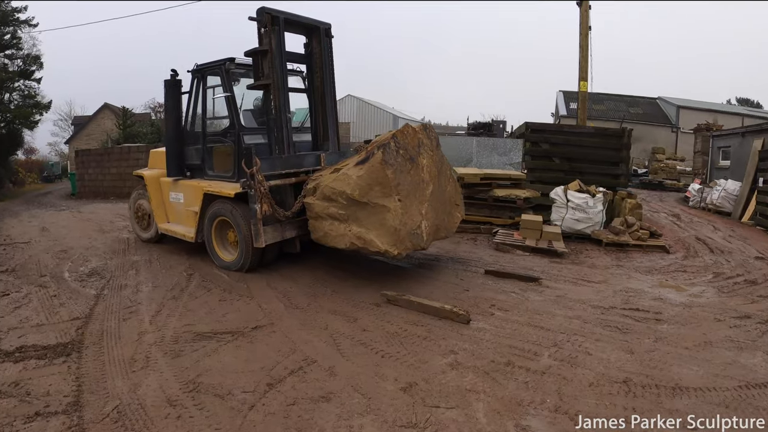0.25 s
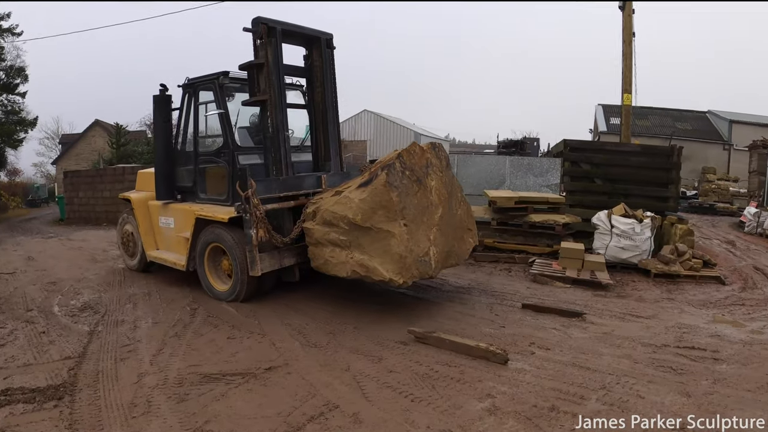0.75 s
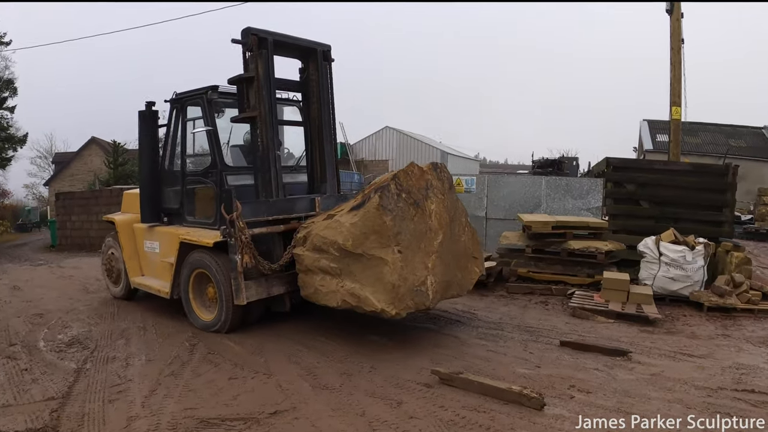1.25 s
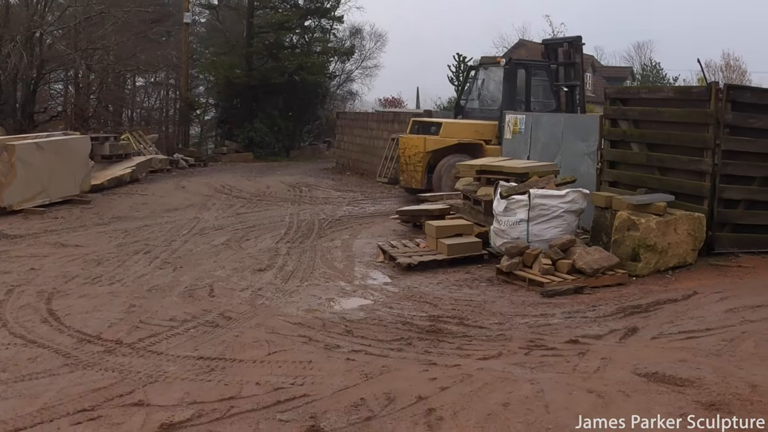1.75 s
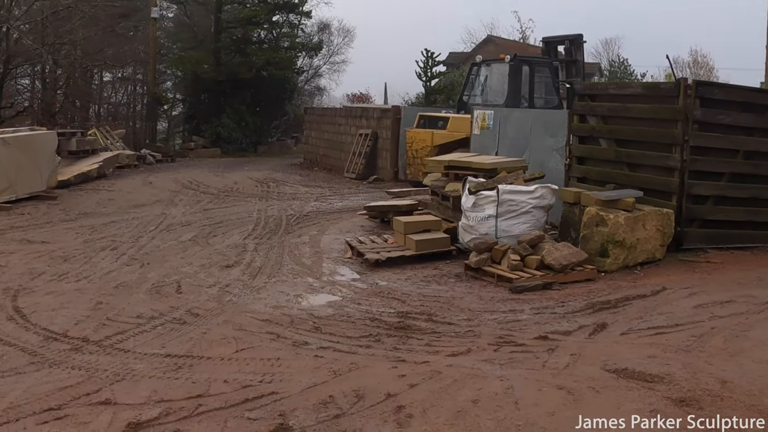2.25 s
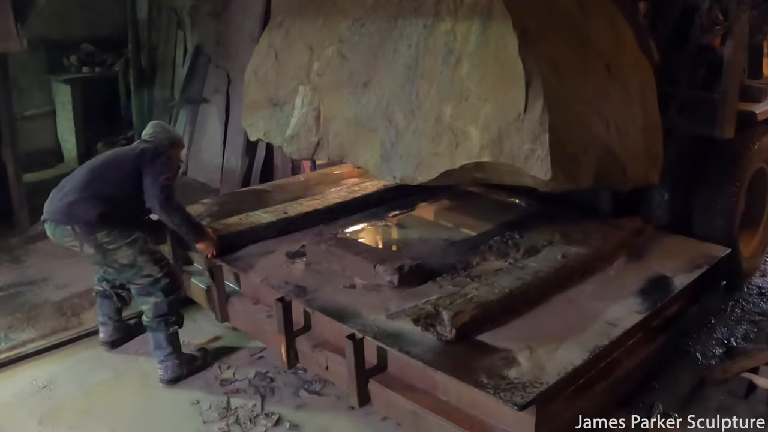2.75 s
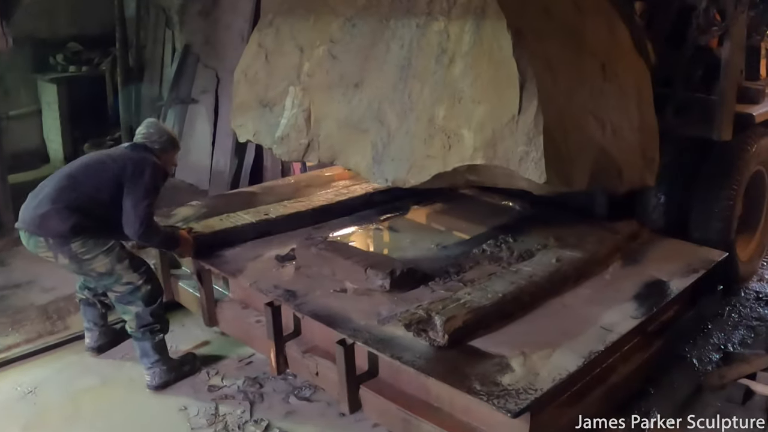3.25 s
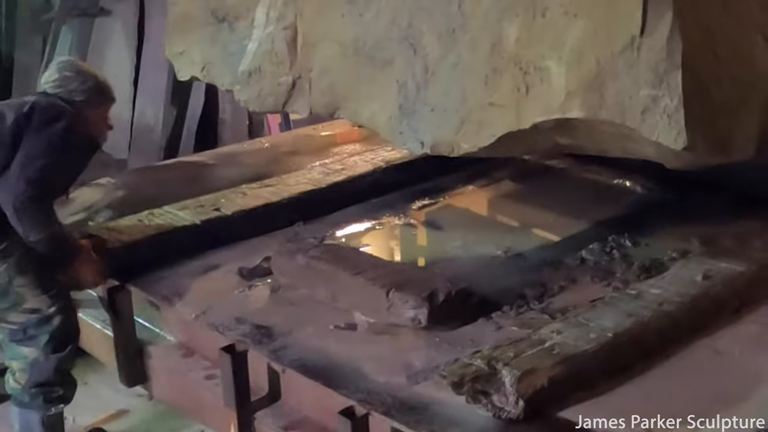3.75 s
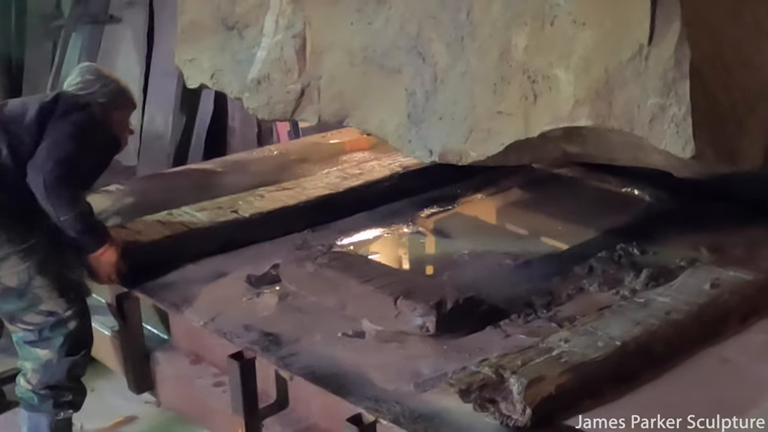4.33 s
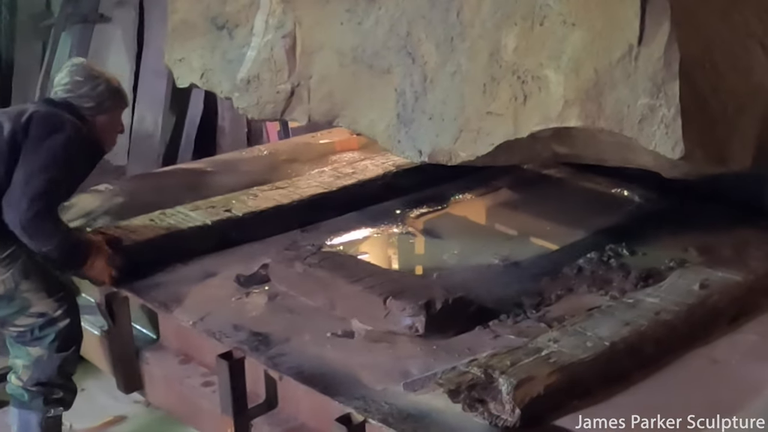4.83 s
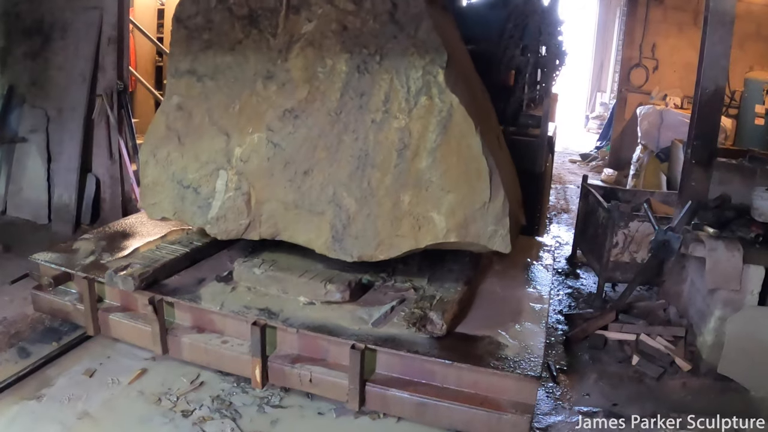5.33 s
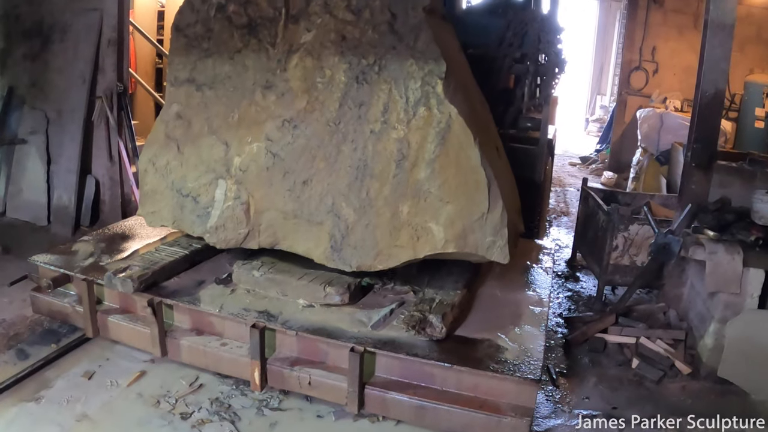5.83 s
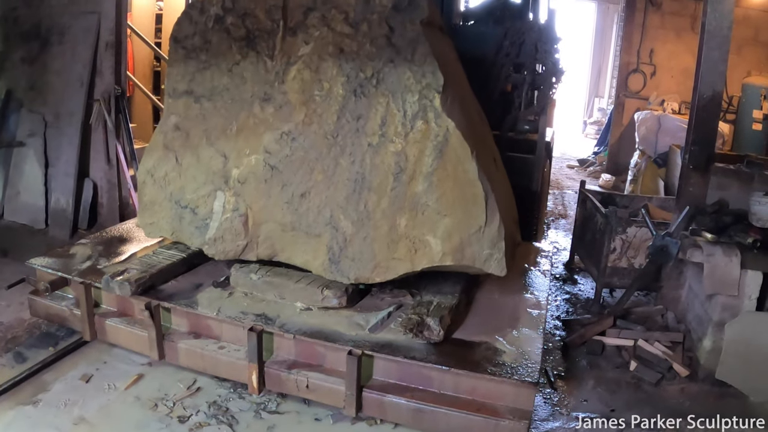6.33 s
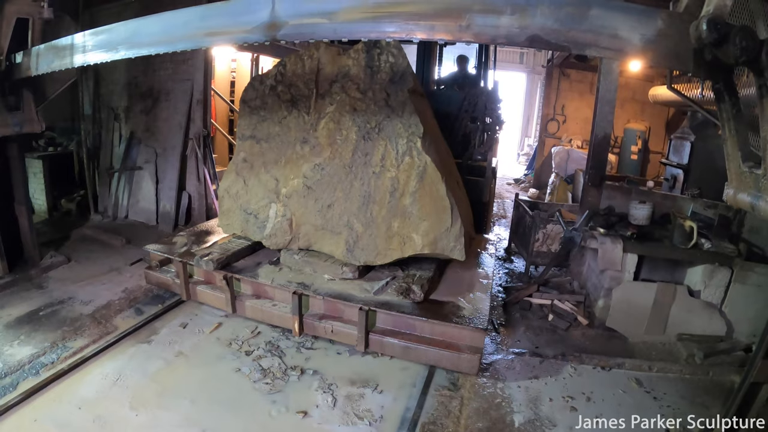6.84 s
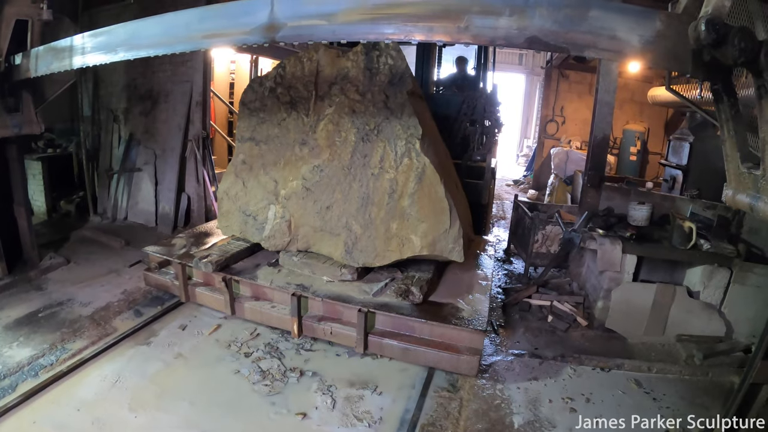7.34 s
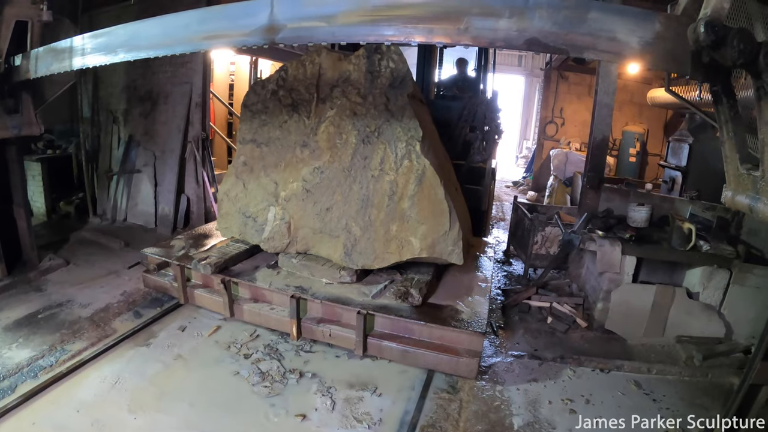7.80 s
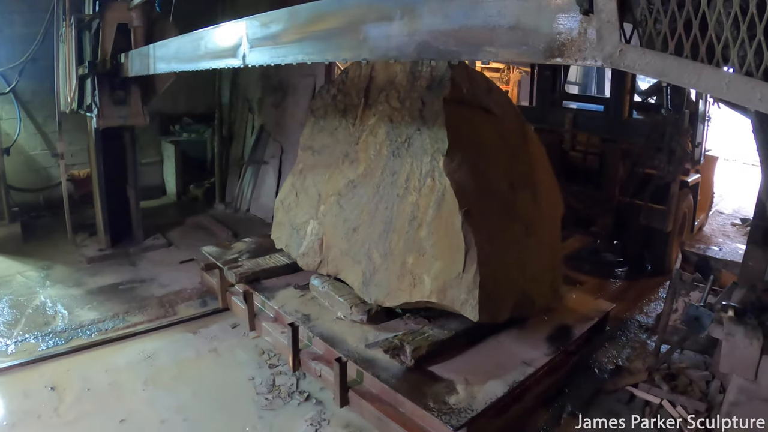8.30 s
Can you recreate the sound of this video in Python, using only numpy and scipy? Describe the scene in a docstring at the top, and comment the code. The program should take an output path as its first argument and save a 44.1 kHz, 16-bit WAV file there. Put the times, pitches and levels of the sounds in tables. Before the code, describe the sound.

From 0 s a heavy diesel forklift runs close by in a yard, with a deep exhaust boom, dense clatter and loose chain jingle. A brief low groan opens it, and bright clinks come at 0.4, 0.9 and thickly from 1.3 to 1.5 s. From about 1.1 s the revs fall towards idle. After a tiny gap at 1.6 s it pulls hard at steady revs, clatter fading with distance, until 2.5 s. Silence until about 2.7 s, then a slow throbbing idle in a shed, with soft knocks, faint whine and pulsing drone; a short groan at 3.5 s. At 5.15 s a rough metallic buzz joins, beating with the boom. Timbers thud in clusters at 6.6 and 6.9 s. A faint hydraulic whine enters near 7.4 s, creaks at 7.6 s. At 7.9 s the buzz stops; stone scrapes, jolts ringing metal and rumbles to rest by 8.3 s. Fluttering idle continues, with a last groan at 8.5 s.

```python
"""A forklift engine booms and clatters over a yard, lets its revs fall, pulls again farther off, then idles in a shed.
Two short silences part these three stretches. Sine tones make the exhaust; noise in bursts makes the clatter of firings.
Chains jingle on the move, and a metallic buzz of repeating noise joins the idle for a while and beats with the boom.
The stone load groans on sagging tones, thuds on ringing timbers and settles with jolts, a scrape and a rough rumble."""
import sys
import numpy as np
from scipy import signal
from scipy.fft import rfft, irfft
from scipy.io import wavfile

SR = 44100
rng = np.random.default_rng(int(sys.argv[2]) if len(sys.argv) > 2 else 0)


def master(y):
    """Save y as 16-bit WAV."""
    cut = np.clip(np.atleast_2d(y).T, -1, 1)
    pcm = np.round(cut * 32767)  # scale
    wavfile.write(sys.argv[1], SR, pcm.astype(np.int16))


N = 377496
TIME = np.arange(N) / SR  # seconds
BINS = np.maximum(np.arange(N // 2 + 1) * SR / N, 1)  # Hz
SIDES = np.array([[1], [-1]])  # left, right

# how wide the yard and the shed sound: (f/Hz, side minus middle level/dB)
YARD_WIDTH = [(60, -39), (240, -20), (950, -13), (3770, -6.5), (15000, 1.5)]
SHED_WIDTH = [(60, -42), (240, -18.5), (950, -8), (3770, -1.5), (15000, -1.5)]
# which way the sound leans: (f/Hz, left minus right level/dB)
YARD_PAN = [(60, -1), (240, -0.5), (950, 0.5), (3770, 5), (15000, -5.5)]
SHED_PAN = [(60, 2), (240, -0.5), (950, 1.5), (3770, 3.5), (15000, 0)]

# when each stretch is heard: (start/s, end/s, fade-out/s)
DRIVE_SPAN, PULL_SPAN, IDLE_SPAN = (-0.075, 1.622, 0.05), (1.654, 2.526, 0.02), (2.69, 9, 0.02)
IDLE_HZ = 5.525  # working cycles of the engine per second
FIRINGS = 8  # per working cycle
BUZZ_HZ = 24.28  # turns per second of the buzzing machine
BUZZ_ON_S, BUZZ_RISE_S, BUZZ_OFF_S, BUZZ_FALL_S = 5.155, 0.06, 7.91, 0.12


def from_db(db):
    """Turn decibels into a gain."""
    return 10 ** (np.asarray(db) / 20)


def rms_one(x):
    """Scale a signal to unit power."""
    return x / np.sqrt(np.mean(x ** 2) + 1e-20)


def in_pitch(points):
    """Read a table of (f/Hz, level/dB) at every frequency bin, evenly along pitch."""
    hz, db = np.transpose(points)
    return np.interp(np.log(BINS), np.log(hz), db)


def bell(hz, width):
    """Give the strength of one resonance over frequency, 1 at its top."""
    return 1 / np.sqrt(1 + ((BINS ** 2 - hz ** 2) / (BINS * width)) ** 2)


def drift(rate):
    """Wander slowly at random with a spread of 1; a higher rate in Hz wanders faster."""
    smooth = rfft(rng.standard_normal(N)) / (1 + (BINS / rate) ** 2)
    return rms_one(irfft(smooth, N))


def ease(start, length):
    """Step smoothly from 0 to 1; start and length in seconds."""
    return np.sin(np.pi / 2 * np.clip((TIME - start) / length, 0, 1)) ** 2


def heard(span):
    """Fade a stretch in, hold it and fade it out."""
    start, end, fade_out = span
    fade_in = 0.085  # s
    return (ease(start, fade_in) * (1 - ease(end - fade_out, fade_out))) ** 2


def radiate(pair, colour, rings, width, pan):
    """Pass two unrelated noises through a ringing body to get the left and right spectra."""
    lifts_db = sum(db * bell(hz, wide) ** 2 for hz, wide, db in rings)
    mid, side = rfft(pair) * from_db(in_pitch(colour) + lifts_db)
    spread = mid + side * from_db(in_pitch(width)) * SIDES
    return spread * from_db(in_pitch(pan) * SIDES / 2)


def unit_mid(spectra):
    """Return to a stereo wave whose middle has unit power."""
    wave = irfft(spectra, N)
    return wave / np.std(wave.mean(axis=0))


def rattle(turns, alike):
    """Make dense contacts as noise: the share alike returns on every turn, the rest is always new."""
    size = int(N / turns[-1])
    loop = rng.standard_normal((2, size))[:, (turns % 1 * size).astype(int)]
    return np.sqrt(alike) * loop + np.sqrt(1 - alike) * rng.standard_normal((2, N))


def knocks(turns, sharp, uneven_db, count=FIRINGS):
    """Give each knock a burst that dies away; places in the turn and single knocks differ in strength."""
    knock = (turns * count).astype(int)
    by_place = rng.standard_normal(count)[knock % count]
    by_knock = rng.standard_normal(knock[-1] + 1)[knock]
    burst = np.exp(-sharp * (turns * count % 1))
    return rms_one(from_db(uneven_db * (by_place + by_knock)) * burst)


def exhaust(turns, orders, waver):
    """Add tones at multiples of the working cycle; weak ones wander most in phase, by up to waver radians rms."""
    out = 0
    for order, db in orders:
        phase = 2 * np.pi * (order * turns + rng.random())
        wander = waver * (1 - from_db(min(db, 0))) * drift(11.0)
        out = out + from_db(db) * np.sin(phase + wander)
    return rms_one(out)


def clatter(spectra, clatter_db, hiss_db):
    """Set the engine block's clatter and the brighter hiss of injectors and fan each at its level."""
    low = 1 / (1 + (BINS / 1800) ** 8)  # parts them at 1800 Hz
    block = from_db(clatter_db) * unit_mid(spectra * low)
    return block + from_db(hiss_db) * unit_mid(spectra * (1 - low))


def whine(tones):
    """Sound steady tones (f/Hz, level/dB rms) that flutter a little in level and phase."""
    out = 0
    for hz, db in tones:
        level = from_db(db + 0.9 * drift(3.9))
        out = out + level * np.sin(2 * np.pi * hz * TIME + 0.12 * drift(3.3))
    return np.sqrt(2) * out


def ring(clicks, hz, t60):
    """Let a resonance answer clicks: a unit click starts a sine of height 1 that falls 60 dB in t60 seconds."""
    r, w = from_db(-60 / (t60 * SR)), 2 * np.pi * hz / SR
    return signal.lfilter([0, np.sin(w)], [1, -2 * r * np.cos(w), r * r], clicks + 1e-18)


def struck(blows, modes, contact_s, uneven_db):
    """Make each blow a short crunch of noise that rings every mode with a strength of its own."""
    out, size = np.zeros(N), SR // 2
    for s, db in blows:
        start = int(s * SR)
        for hz, mode_db, t60 in modes:
            crunch = rng.standard_normal(size) * np.exp(-TIME[:size] / contact_s)
            wave = ring(crunch, hz, t60)
            peak = from_db(db + mode_db + uneven_db * rng.standard_normal())
            out[start:start + size] += (peak * wave / abs(wave).max())[:N - start]
    return out


def tailpipe(wave):
    """Swell tones near the pipe's resonance and lose the deepest, which the pipe hardly sends out."""
    lift = from_db(10.5 * bell(48.8, 12) ** 2)  # up to 10.5 dB at 48.8 Hz, 12 Hz wide
    cut = 1 / np.sqrt(1 + (34 / BINS) ** 12)  # below 34 Hz
    return irfft(rfft(wave) * lift * cut, N)


def driving():
    """Rattle unevenly over the ground close by under load; then the load drops and the revs fall."""
    # engine speed: (t/s, working cycles per second)
    speed_points = [(0.0, 8.06), (1.1, 8.36), (1.202, 7.87), (1.304, 6.44), (1.402, 5.47), (1.5, 4.97),
                    (1.6, 4.78)]
    # exhaust tones: (multiple of the cycle rate, relative level/dB)
    orders = [(4, -17), (5, -9), (6, -34), (7, -15.5), (8, 2.5), (9, -13), (10, -12.5), (11, -3.5),
              (12, -14), (13, -12.5), (16, -10.5), (17, -16), (25, -17)]
    # tone colour of the clatter: (f/Hz, relative level/dB per Hz)
    colour = [(59, -42), (100, -4), (165, -12), (196, -6.5), (231, -11), (285, -12), (359, -17),
              (443, -16.5), (607, -16.5), (1370, -15.5), (1840, -24), (2990, -23), (5720, -33.5),
              (15000, -66.5)]
    # ringing panels: (f/Hz, width/Hz, lift/dB)
    panels = [(283, 11, 4), (442, 9.4, 9.5), (600, 33, 6), (734, 15, 8), (907, 19, 7.5), (2130, 280, 4.5)]
    loaded_db, coasting_db = (-21.5, -25.5, -35), (-27, -32.5, -36.5)  # exhaust, clatter, hiss
    turns = np.cumsum(np.interp(TIME, *np.transpose(speed_points))) / SR
    unloaded = ease(1.0, 0.32)  # the driver lifts off
    exhaust_db, clatter_db, hiss_db = (
        full + (coast - full) * unloaded for full, coast in zip(loaded_db, coasting_db))
    uneven_ground = from_db(0.7 * drift(120))
    blows = rattle(turns, alike=0.52) * knocks(turns, sharp=0.48, uneven_db=0.07) * uneven_ground
    body = radiate(blows, colour, panels, YARD_WIDTH, YARD_PAN)
    # the exhaust falters by 6 dB just before the engine catches at idle
    lull_db = -6 * np.exp(-((TIME - 1.48) / 0.038) ** 2)
    boom = from_db(exhaust_db + lull_db) * tailpipe(exhaust(turns, orders, waver=0.12))
    opening = ease(0, 0.008)
    return (boom + clatter(body, clatter_db, hiss_db)) * opening * heard(DRIVE_SPAN)


def chains(count=18):
    """Let chain links touch in loose clusters, a few hard and most softly, while the forklift rolls."""
    lowest_hz, highest_hz, link_t60, db_per_octave = 2020, 6270, 0.018, -7
    rate = 260 * from_db(4 * drift(8))  # touches per second, wandering around 260
    touching = rng.random(N) < rate / SR
    sizes = from_db(6.5 * np.minimum(rng.exponential(1, N), 3)) * touching
    touches = sizes * (rng.choice([-1, 1], N) + 0.5 * rng.standard_normal((2, N)))
    dealt = rng.integers(0, count, N)  # which link each touch rings
    links = 0
    for k, hz in enumerate(np.geomspace(lowest_hz, highest_hz, count)):
        gain = from_db(db_per_octave * np.log2(hz / lowest_hz))
        links = links + gain * ring(touches * (dealt == k), hz, link_t60)
    return from_db(-42) * rms_one(links) * heard(DRIVE_SPAN)


def groans():
    """Set mast and timbers sounding for a moment as the load shifts, on a rough, sagging pitch."""
    # groans: (middle t/s, swell length/s, f/Hz, scale of the pitch's wander and sag/Hz, level/dB rms at the top)
    groan_list = [(0.024, 0.075, 201, 4, -25), (0.27, 0.22, 284, 2, -35.5), (3.499, 0.078, 165, 14, -27),
                  (7.568, 0.022, 510, 90, -28), (7.609, 0.052, 345, 50, -28), (8.51, 0.049, 316, 65, -31.5)]
    out = 0
    for s, length, hz, width, db in groan_list:
        swell = np.exp(-0.5 * ((TIME - s) / length) ** 2)
        sag = 0.49 * np.tanh((TIME - s) / length)
        pitch = hz + width * (0.71 * drift(62.4) - sag)
        level = from_db(db + 1.2 * drift(40)) * swell
        out = out + level * np.sqrt(2) * np.sin(2 * np.pi * np.cumsum(pitch) / SR)
    return out


def clinks():
    """Make short bright contacts of chain and grit from bands of noise that die quickly."""
    # clinks: (t/s, level at the start/dB, f/Hz, time to fall 60 dB/s)
    clink_list = [(0.435, -28, 3000, 0.051), (.513, -37, 2800, .04), (0.882, -24.5, 2600, 0.1),
                  (.918, -28, 3000, 0.05), (1.014, -44, 7000, .04), (1.125, -34, 2600, .04),
                  (1.136, -29, 3500, .04), (1.24, -33, 2400, .03), (1.336, -22, 2300, 0.026),
                  (1.35, -25, 2700, 0.034), (1.434, -26.5, 1910, 0.035), (1.442, -25.5, 3200, 0.046),
                  (1.511, -28, 2600, .03), (1.538, -30, 3300, 0.05), (3.466, -39.5, 3430, 0.3),
                  (3.512, -46, 5400, 0.17), (4.461, -39.5, 3470, 0.08), (6.596, -36, 4500, .15),
                  (6.886, -36, 4500, 0.15)]
    out, size = np.zeros((2, N)), SR // 2
    for s, db, hz, t60 in clink_list:
        start = int(s * SR)
        edges = [hz / 2.7, min(hz * 1.5, SR * 0.4)]
        band = signal.butter(2, edges, "band", fs=SR, output="sos")
        noise = rng.standard_normal((2, size))
        mid, side = rms_one(signal.sosfilt(np.vstack([band, band]), noise))  # filtered twice
        decay = np.exp(-np.log(1000) * TIME[:size] / t60)
        out[:, start:start + size] += (mid + 0.43 * side * SIDES) * from_db(db) * decay
    return out


def pulling():
    """Work hard at steady revs while the clatter and hiss fade as it passes behind the stacks."""
    # exhaust tones: (multiple of the cycle rate, relative level/dB)
    orders = [(4, -20.5), (6, -8), (8, -1.5), (10, 0.5), (14, -7.5), (16, -9.5), (18, -15.5), (32, -15),
              (40, -13.5), (42, -16.5)]
    # tone colour of the clatter: (f/Hz, relative level/dB per Hz)
    colour = [(59, -29), (100, -4.5), (159, -9), (279, -13), (352, -14.5), (391, -20), (452, -17),
              (633, -11), (1260, -16.5), (1370, -13), (1660, -25), (2230, -15), (8700, -46), (15000, -75.5)]
    # ringing panels: (f/Hz, width/Hz, lift/dB)
    panels = [(202, 81, 7), (1800, 480, 4), (2900, 230, 3.5), (4860, 640, 4), (8750, 1900, 3.5)]
    start_db, db_per_s = (-20, -20, -32.5), (0, -5.5, -4.5)  # exhaust, clatter, hiss
    turns = 6.88 * TIME  # working cycles per second
    elapsed = np.clip(TIME, PULL_SPAN[0], PULL_SPAN[1]) - PULL_SPAN[0]
    exhaust_db, clatter_db, hiss_db = (db + slope * elapsed for db, slope in zip(start_db, db_per_s))
    blows = rattle(turns, alike=0.4) * knocks(turns, sharp=0.2, uneven_db=0.9)
    body = radiate(blows, colour, panels, YARD_WIDTH, YARD_PAN)
    boom = from_db(exhaust_db) * exhaust(turns, orders, waver=0.3)
    return (boom + clatter(body, clatter_db, hiss_db)) * heard(PULL_SPAN)


def shed_levels():
    """Hold exhaust, clatter and hiss steady at each listening place and blend into the next."""
    # places: (middle of the blend t/s, blend/s, exhaust level/dB, clatter level/dB, hiss level/dB);
    # the first place holds from the start, so its two times are not used
    places = [(2.6, 0.12, -19, -21, -38.5), (3.55, 0.89, -21.5, -26, -43), (5.18, 0.043, -17.5, -32, -42.5),
              (8.02, 0.31, -23.5, -30, -41.5)]
    levels = np.array(places[0][2:])[:, None]
    for s, blend, *place_db in places[1:]:
        levels = levels + (np.array(place_db)[:, None] - levels) * ease(s - blend / 2, blend)
    return levels


def beat(hz, depth, dip_s):
    """Give a weaker tone, hz above a strong one, that opposes it once per beat, as at dip_s."""
    return -depth * np.exp(2j * np.pi * hz * (TIME - dip_s))


def throb(boom, buzz_share):
    """Let the boom beat once per cycle, or with a hum at twice the buzz rate during the buzz; later it flutters."""
    cycle = beat(IDLE_HZ, depth=0.42, dip_s=3.68) * (1 - buzz_share)
    hum = beat(2 * BUZZ_HZ - FIRINGS * IDLE_HZ, depth=0.32, dip_s=5.54) * buzz_share
    flutter = beat(14.4, depth=0.7, dip_s=8.135) * ease(BUZZ_OFF_S, BUZZ_FALL_S)
    power = 1 + abs(cycle) ** 2 + abs(hum) ** 2 + abs(flutter) ** 2
    return np.real(signal.hilbert(boom) * (1 + cycle + hum + flutter)) / np.sqrt(power)


def drone():
    """Boom a panel on one tone that swells once in every working cycle."""
    swell = np.cos(np.pi * IDLE_HZ * (TIME - 3.97)) ** 4  # one swell tops at 3.97 s
    level = from_db(-29 + drift(3.7))
    return level * swell * np.sin(2 * np.pi * 192.6 * TIME + 0.99 * drift(3.3))


def idling(buzz_share):
    """Idle in the shed with a throbbing boom and soft knocks; whine and drone stop when the buzz begins."""
    # exhaust tones: (multiple of the cycle rate, relative level/dB)
    orders = [(4, -24), (5, -22), (8, 3), (11, -21), (17, -22), (22, -25), (24, -20), (35, -23)]
    # tone colour of the clatter: (f/Hz, relative level/dB per Hz)
    colour = [(38, -23), (65, 3), (71, -1.5), (185, -7), (375, -6.5), (504, -17), (619, -9), (976, -13.5),
              (1120, -13.5), (1280, -16.5), (1650, -23.5), (1810, -27.5), (9510, -62), (15000, -80.5)]
    # ringing panels: (f/Hz, width/Hz, lift/dB)
    panels = [(103, 45, 3.4), (207, 42, 3.2), (463, 10, 9.5), (1130, 30, 4.1), (1680, 31, 5.1)]
    # whine: (f/Hz, level/dB rms)
    tones = [(619, -48), (894, -46), (1125, -41.5), (1686, -52.5)]
    turns = IDLE_HZ * TIME
    exhaust_db, clatter_db, hiss_db = shed_levels()
    blows = rattle(turns, alike=0.48) * knocks(turns, sharp=0.1, uneven_db=0.0)
    body = radiate(blows, colour, panels, SHED_WIDTH, SHED_PAN)
    boom = from_db(exhaust_db) * throb(exhaust(turns, orders, waver=0.63), buzz_share)
    singing = (whine(tones) + drone()) * (1 - ease(BUZZ_ON_S, BUZZ_RISE_S))
    return (boom + clatter(body, clatter_db, hiss_db) + singing) * heard(IDLE_SPAN)


def buzz():
    """Buzz like metal: a smooth rattle that partly repeats on every turn, with a few tones standing out."""
    # tone colour: (f/Hz, relative level/dB per Hz)
    colour = [(38, -10), (65, -14), (76, -16), (129, -12.5), (222, -15.5), (267, -12.5), (299, -22),
              (359, -28), (393, -15.5), (663, -18), (832, -18), (999, -15), (1570, -25.5), (5510, -37.5),
              (15000, -70)]
    # resonances: (f/Hz, width/Hz, lift/dB)
    rings = [(2280, 1000, -3.5), (2870, 190, 9), (3800, 480, 4), (5500, 370, 4), (7520, 270, 7.5)]
    # standing tones: (f/Hz, level/dB rms)
    tones = [(24.3, -34), (298, -39.5), (534.3, -53), (558.6, -48), (656.1, -39.5), (777.3, -54),
             (923, -51), (972, -40), (996, -56), (1690, -54.5), (2794, -55.5), (2867, -58), (2915, -59),
             (2939, -59), (3715, -55.5), (3887, -59), (5346, -67), (7531, -71)]
    turns = BUZZ_HZ * TIME
    blows = rattle(turns, alike=0.66) * knocks(turns, sharp=0.16, uneven_db=0.5, count=3)
    body = radiate(blows, colour, rings, SHED_WIDTH, SHED_PAN)
    return from_db(-28) * unit_mid(body) + whine(tones)


def timbers():
    """Thud the timbers under the stone: each blow rings their low modes."""
    # blows: (t/s, level/dB)
    blows = [(6.616, -21), (6.645, -23.5), (6.7, -24), (6.906, -23), (6.935, -26), (6.99, -22)]
    # modes: (f/Hz, level relative to the blow/dB, time to fall 60 dB/s)
    modes = [(65.4, -2, .15), (92, 3, 0.28), (123.7, 0.5, 0.39), (151.1, -4, 0.45), (196, -5.5, 0.18),
             (720, -12, .06)]
    return struck(blows, modes, contact_s=0.0093, uneven_db=1.5)


def lowering():
    """Let the hydraulics whine faintly as the load comes down."""
    return whine([(1700, -48.5)]) * ease(7.35, 0.2) * (1 - ease(BUZZ_OFF_S, BUZZ_FALL_S))


def settling():
    """Scrape stone on steel, jolt the bed and forks into ringing and grind to rest in a rough rumble."""
    # tone colours of rumble and scrape: (f/Hz, relative level/dB per Hz)
    rumble_colour = [(59, -48), (100, -2), (246, -2.5), (290, -1), (511, -12.5), (780, -11), (854, -9.5),
                     (1230, -11), (1910, -21.5), (3770, -30.5), (8000, -60), (15000, -95)]
    scrape_colour = [(500, -40), (1500, -6), (2100, 2), (2850, -1), (3300, -7), (8000, -50), (15000, -85)]
    # resonances of the rumble: (f/Hz, width/Hz, lift/dB)
    rings = [(298, 34, 4.5), (980, 90, 3), (1310, 90, 4.5), (2450, 700, 1.8)]
    # jolts as the stone lands: (t/s, level/dB)
    jolts = [(7.942, -20.5), (7.975, -22.5), (8.03, -24.5), (8.09, -28)]
    # modes of bed and forks: (f/Hz, level relative to the jolt/dB, time to fall 60 dB/s)
    modes = [(280, -7, 0.38), (302.4, -6, 0.31), (737, -8, .3), (774, -3, 0.36), (1140, -14, .3),
             (1240, -4, 0.17), (1240, -14, .22), (2160, -13, 0.18)]
    start, attack, release = 7.915, 0.025, 0.39  # s, rumble
    bite_start, bite_attack, bite_t60 = 7.935, 0.039, 0.18  # s, scrape
    grains = rng.standard_normal((2, N)) * from_db(0.43 * drift(110))
    swell = ease(start, attack) * (1 - ease(start + attack, release))
    rumble_body = radiate(grains, rumble_colour, rings, SHED_WIDTH, SHED_PAN)
    rumble = from_db(-19.5) * swell * unit_mid(rumble_body)
    since_bite = np.maximum(TIME - bite_start - bite_attack, 0)
    bite = ease(bite_start, bite_attack) * from_db(-36 - 60 * since_bite / bite_t60)
    scrape = bite * unit_mid(radiate(grains, scrape_colour, [], SHED_WIDTH, SHED_PAN))
    return rumble + scrape + struck(jolts, modes, contact_s=0.018, uneven_db=3.0)


def off_axis(pair):
    """Bring the sound to the left microphone a little later, yet louder."""
    lag_s, left_over_right_db = 0.8 / SR, 0.5
    left = np.interp(TIME - lag_s, TIME, pair[0])
    return np.array([left * from_db(left_over_right_db / 2), pair[1] * from_db(-left_over_right_db / 2)])


def scene():
    """Mix all sources; from the pull until the buzz begins, all is heard from straight ahead."""
    buzz_share = ease(BUZZ_ON_S, BUZZ_RISE_S) * (1 - ease(BUZZ_OFF_S, BUZZ_FALL_S))
    engine = driving() + pulling() + idling(buzz_share)
    load = groans() + timbers() + lowering() + settling()
    both = engine + chains() + clinks() + buzz_share * buzz() + load
    spread = (TIME < PULL_SPAN[0]) + ease(BUZZ_ON_S, BUZZ_RISE_S)
    return (1 - spread) * both.mean(axis=0) + spread * off_axis(both)


def record(dry):
    """Cut the top steeply: from 15900 Hz up, all is at least 70 dB down."""
    return signal.sosfilt(signal.cheby2(12, 70, 15900, fs=SR, output="sos"), dry)


dry = scene()
out = record(dry)
master(out)
```